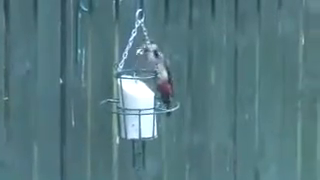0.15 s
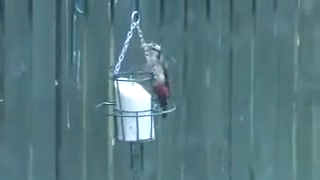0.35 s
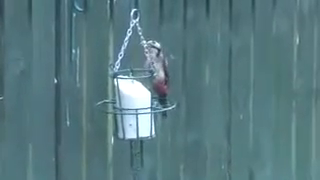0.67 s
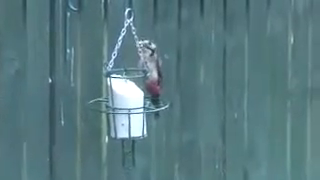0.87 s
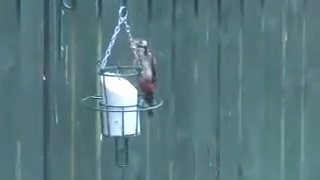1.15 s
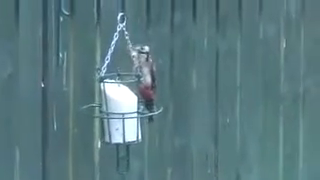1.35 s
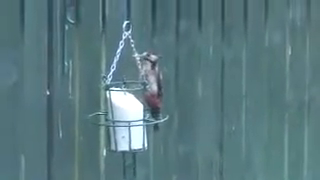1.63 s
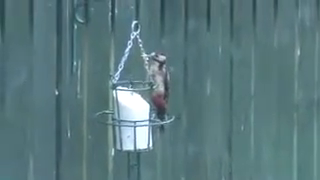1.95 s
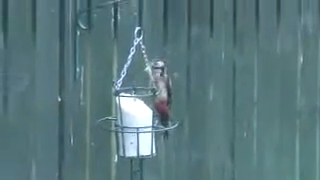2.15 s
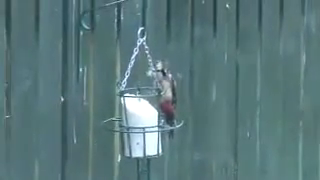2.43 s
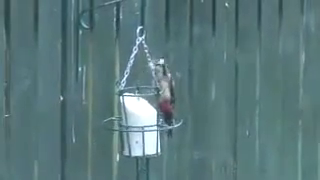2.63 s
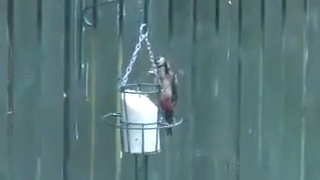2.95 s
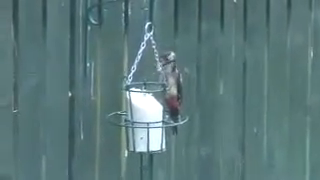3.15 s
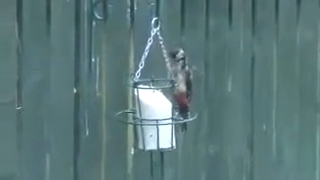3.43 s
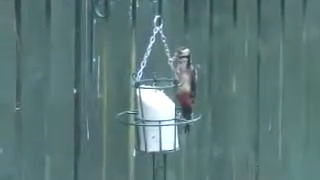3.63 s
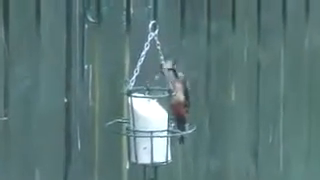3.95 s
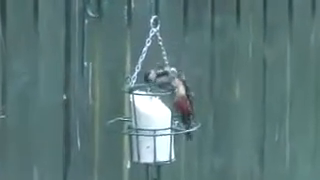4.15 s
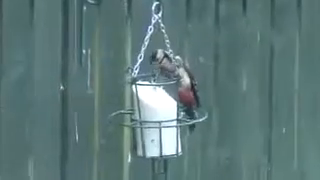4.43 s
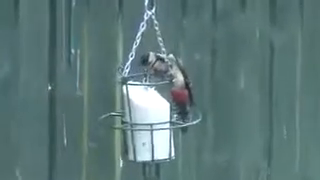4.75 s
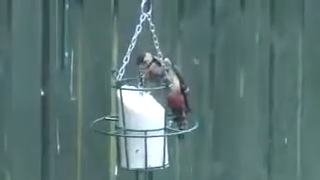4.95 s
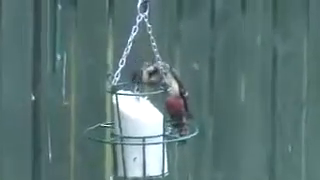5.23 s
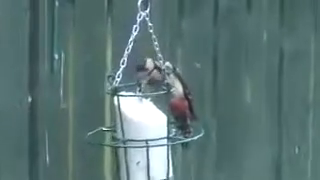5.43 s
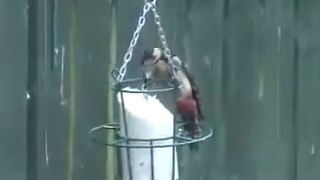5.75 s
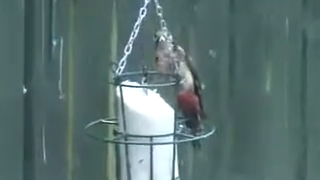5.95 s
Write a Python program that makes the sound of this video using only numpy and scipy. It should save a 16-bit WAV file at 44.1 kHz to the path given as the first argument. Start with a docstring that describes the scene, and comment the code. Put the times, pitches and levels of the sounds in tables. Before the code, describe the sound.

Irregular crisp bill knocks, grainy scuffs and tiny wire ticks from a bird at a garden feeder, over constant mains hum and faint hiss.

```python
"""A young woodpecker pecks at a peanut cake in a hanging wire feeder.
From the start a mains hum, a faint electronic whine, soft air noise and a low rumble lie underneath.
First comes a scuff as the bird shifts its grip, made of shaped noise, with a dull thud of low noise after it.
Then come sharp pecks (short rings, crushing noise, a crack), each with its own thud, and soon thin wire ticks.
More scuffs fall in between. Hard surfaces nearby answer the scuffs, pecks and ticks."""
import sys
import numpy as np
from scipy import signal
from scipy.fft import rfft, irfft, next_fast_len
from scipy.io import wavfile
from scipy.ndimage import uniform_filter1d, map_coordinates

SR = 44100
rng = np.random.default_rng(int(sys.argv[2]) if len(sys.argv) > 2 else 0)


def materialize(psi):
    """Save the field psi as 16-bit PCM at rate SR to the path in sys.argv[1].

    A 1-D psi becomes a single channel; in a 2-D psi each row is a channel.
    """
    bounded = np.clip(np.atleast_2d(psi).T, -1, 1)
    quanta = np.round(bounded * 32767).astype(np.int16)
    wavfile.write(sys.argv[1], SR, quanta)


N = 268128  # length of the scene in samples


def amp(db):
    """Turn decibels into a plain factor."""
    return 10 ** (np.asarray(db) / 20)


def unit(x):
    """Scale x to an rms of 1."""
    return x / np.sqrt(np.mean(x ** 2) + 1e-20)


def burst(x):
    """Scale x to a total energy of 1."""
    return x / np.sqrt(np.sum(x ** 2) + 1e-20)


def along(points, hz):
    """Read a curve of (Hz, value) points at any pitch, on a log pitch axis."""
    point_hz, values = np.transpose(points)
    return np.interp(np.log(hz + 1), np.log(point_hz + 1), values)


def filtered(x, response):
    """Multiply the spectrum of x by a response, given as a function of frequency."""
    n = x.shape[-1]
    padded = next_fast_len(n + 8192)
    spectrum = rfft(x, padded) * response(np.fft.rfftfreq(padded, 1 / SR))
    return irfft(spectrum, padded)[..., :n]


def noise(spectrum, size):
    """Make noise of rms 1, coloured by (Hz, dB) points."""
    return unit(filtered(rng.standard_normal(size), lambda hz: amp(along(spectrum, hz))))


def add(track, s, sound):
    """Mix a sound into the track at time s in seconds."""
    start = max(round(s * SR), 0)
    track[:, start:start + sound.shape[-1]] += sound[..., :N - start]


# Level of the mains hum over time. Each row: time in seconds, level in dB.
HUM_LEVELS = [(0.2, -44), (0.88, -43), (2.55, -45), (4.18, -43.5), (4.8, -43), (4.95, -44), (5.9, -45.5)]
# Tones of the electronic whine. Each row: pitch in Hz, average level in dB before it wavers.
WHINE_TONES = [(1319, -73), (1561, -73), (2697, -67), (3214, -78), (5701, -75), (8655, -73), (11541, -73),
               (14423, -77)]
# Colour of the soft air noise of the garden. Each row: pitch in Hz, relative level in dB per Hz.
AIR_COLOUR = [(88, -22), (150, -11), (186, -2.5), (274, -9), (332, -4.5), (445, -7), (481, -2), (572, -1),
              (695, -6), (1340, -6.5), (2410, -10.5), (3040, -12), (5870, -15), (15500, -25.5)]
# How alike the air noise is at left and right. Each row: pitch in Hz, likeness from 0 to 1.
AIR_LIKENESS = [(60, 0.11), (150, 0.11), (380, 0.61), (950, 0.39), (2380, 0.18), (5980, 0.16),
                (15000, 0.83)]
# Colour of the low rumble in the air. Each row: pitch in Hz, relative level in dB.
RUMBLE_COLOUR = [(20, -26), (35, -12), (52, 9), (72, -7), (150, -10.5), (200, -10.5), (330, -9),
                 (500, -21.5)]
HUM_HZ = 120
RUMBLE_DB = -60


def background(hum_db=0.0, air_db=-51.0, waver_db=1, rumble_side_db=-7):
    """A pure mains hum and faint wavering high tones, over soft, steady air noise and rumble."""
    t = np.arange(N) / SR
    hum_level = np.interp(t, *np.transpose(HUM_LEVELS)) + hum_db
    hum = amp(hum_level) * unit(np.sin(2 * np.pi * HUM_HZ * t))

    def waver():
        """A slow random drift with 5 new values a second."""
        return map_coordinates(rng.standard_normal(40), [t * 5])

    whine = 0
    for hz, db in WHINE_TONES:
        loudness = amp(waver_db * waver()) * amp(db)
        whine = whine + loudness * unit(np.sin(2 * np.pi * hz * t + .5 * waver()))

    def turn(hz):
        """The angle that splits the air noise into middle and side for the wanted likeness."""
        return np.arccos(np.clip(along(AIR_LIKENESS, hz), 0, 1)) / 2

    mid = filtered(noise(AIR_COLOUR, N), lambda hz: np.cos(turn(hz)))
    side = filtered(noise(AIR_COLOUR, N), lambda hz: np.sin(turn(hz)))
    air = amp(air_db) * np.array([mid + side, mid - side])
    # the rumble is much the same at both microphones
    rumble_side = amp(rumble_side_db) * noise(RUMBLE_COLOUR, N)
    rumble = noise(RUMBLE_COLOUR, N) + rumble_side * np.array([[1], [-1]])
    return air + hum + whine + amp(RUMBLE_DB) * rumble


# Echoes from nearby hard surfaces. Each row: typical delay in seconds,
# strength as a multiple of the direct sound (a minus sign flips the wave).
HARD_ECHOES = [(.0022, .3), (.0052, 1.4), (.0069, -.4)]
# How long the diffuse tail rings. Each row: pitch in Hz, time to fall by 60 dB in seconds.
TAIL_DECAY = [(100, 0.98), (800, 0.41), (2100, 0.28), (4000, 0.36), (8000, 0.29), (13000, 0.26)]


def surroundings(x, tail_db=7.0, scatter_db=0, scatter_s=0.0012, lean_db=6, width=0.62):
    """The direct sound from the left, a few hard echoes, dense scatter and a diffuse tail."""
    t = np.arange(SR // 3) / SR
    # each pitch of the tail dies away at its own pace
    hz, frame_s, z = signal.stft(rng.standard_normal((2, len(t))), SR, nperseg=256)
    fade = amp(-60 * frame_s / along(TAIL_DECAY, hz)[:, None])
    tail = signal.istft(z * fade, SR, nperseg=256)[1][:, :len(t)]
    tail = tail * (1 - np.exp(-t / 0.0029))
    scatter = rng.standard_normal((2, len(t))) * t ** 2 * np.exp(-t / scatter_s)
    # the two microphones sit close together and share part of the diffuse sound
    mid, side = amp(scatter_db) * burst(scatter) + amp(tail_db) * burst(tail)
    diffuse = np.array([mid + width * side, mid - width * side])
    paths = np.zeros(len(t))
    paths[0] = 1
    for delay, strength in HARD_ECHOES:
        # each echo delay varies a little at random from sound to sound
        paths[round(delay * rng.uniform(.92, 1.08) * SR)] += strength
    response = burst(paths) * amp([[lean_db / 2], [-lean_db / 2]]) + diffuse
    return signal.fftconvolve(x[None], burst(response), axes=1)


# Scuffs of claws and bill. Each row: start in seconds, level in dB, body pitch in Hz, rasp pitch in Hz,
# body in dB, grit in dB. The last two are changes from the usual mix of body, rasp and grit.
SCUFF_STROKES = [(0.0004, -33.5, 576, 1770, -4, -7.5), (1.1944, -32.5, 355, 2100, 0.5, -12),
                 (1.2223, -50.5, 355, 2670, 9, -20), (2.5327, -33, 834, 1320, -23, -7),
                 (3.3932, -28, 765, 3130, -7.5, -2.5), (3.4728, -36, 653, 2880, -4, 1.5),
                 (3.6037, -33, 764, 3770, -7, -1), (4.3674, -35, 544, 1300, -29, -21),
                 (4.6288, -33, 816, 2310, -5.5, -6), (4.8655, -19.5, 342, 2010, -9.5, -14.5),
                 (4.8983, -38.5, 257, 1940, 4, -14), (4.9421, -41.5, 690, 1180, 4.5, -2)]
# Hollow body of a scuff. Each row: multiple of the body pitch, relative level in dB.
BODY_COLOUR = [(.2, -22), (.5, -4), (1, -5.5), (1.6, -8.5), (3, -10), (8, -52)]
# Rasp of a scuff. Each row: multiple of the rasp pitch, relative level in dB.
RASP_COLOUR = [(.15, -18), (.45, -17), (1, 0.5), (1.5, -11), (2.5, -16), (6, -33.5)]
# Fine grit of a scuff. Each row: pitch in Hz, relative level in dB.
GRIT_COLOUR = [(2000, 0.5), (5000, -5), (8000, 4), (12500, 2), (16000, -7)]
SCUFF_S, SCUFF_ATTACK_S = 0.018, 0.00017  # fall and rise times of a stroke


def scuffs(body_db=26, rasp_db=25, grit_db=26, grain_db=5):
    """Claws and bill drag in short, grainy strokes: a hollow body, a rasp and fine grit."""
    track, t = np.zeros((2, N)), np.arange(SR // 8) / SR
    for s, db, body_hz, rasp_hz, body, grit in SCUFF_STROKES:
        # smoothed random loudness makes the stroke grainy
        roughness = unit(uniform_filter1d(rng.standard_normal(len(t)), size=60))
        grains = amp(grain_db * roughness)
        stroke = (1 - np.exp(-t / SCUFF_ATTACK_S)) * np.exp(-(t / SCUFF_S) ** 2) * grains
        layers = [(np.multiply(BODY_COLOUR, [body_hz, 1]), body + body_db),
                  (np.multiply(RASP_COLOUR, [rasp_hz, 1]), rasp_db),
                  (GRIT_COLOUR, grit + grit_db)]
        scuff = 0
        for colour, level in layers:
            scuff = scuff + amp(db + level) * burst(stroke * noise(colour, len(t)))
        add(track, s, surroundings(scuff))
    return track


# Colour of the dull thud. Each row: pitch in Hz, relative level in dB.
THUD_COLOUR = [(25, -37), (48, -5), (85, 2.5), (120, -12.5), (190, -14.5), (400, -29.5), (1000, -43)]
THUD_DELAY_S, THUD_SWELL_S = 0.00771, 0.024  # wait after the blow, then time to the peak of the swell
THUD_DB, TYPICAL_BLOW_DB = -13, -20  # level of the thud after a peck of typical level
THUD_GROWS = .4  # dB of thud per dB of blow: the thud grows more slowly than the blow


def thuds(scuff_db=-0.5):
    """Every scuff or peck jolts the feeder, and a dull, low boom swells after it."""
    track, t = np.zeros((2, N)), np.arange(SR // 4) / SR
    swell = t * np.exp(-t / THUD_SWELL_S)
    for blows, kind_db in [(SCUFF_STROKES, scuff_db), (PECK_BLOWS, 0)]:
        for s, db, *_ in blows:
            level = THUD_DB + kind_db + THUD_GROWS * (db - TYPICAL_BLOW_DB)
            add(track, s + THUD_DELAY_S, amp(level) * burst(noise(THUD_COLOUR, len(t)) * swell))
    return track


# Pecks; each has its own middle and high pitch and its own mix. Each row: start in seconds, level in dB,
# middle resonance in Hz, high resonance in Hz, low resonance in dB, high resonance in dB, crack in dB.
# The last three are changes from the usual mix with the middle resonance.
PECK_BLOWS = [(0.8207, -20.5, 2000, 2380, -14, -18.5, -8), (1.0078, -27, 1920, 2710, -7, 1, 2),
              (1.3308, -25.5, 1830, 2630, -14, -7.5, -4), (1.4173, -17, 1940, 3040, -15.5, -10.5, -10),
              (1.6017, -24, 1970, 2840, 1, -30, -5.5), (1.721, -17.5, 1850, 3340, -38, -5.5, -3.5),
              (1.8946, -21, 2260, 2680, -3.5, -10.5, -5.5), (2.4214, -23, 1920, 2610, -15, -31, -9),
              (2.5621, -20, 2130, 2870, -8.5, -5, -8.5), (2.5695, -29, 2260, 2680, -12, -12, 2.5),
              (2.7163, -25.5, 2150, 3250, -14, -3.5, -4), (2.8313, -36, 2070, 2650, -6, 9, 3.5),
              (2.9602, -23, 1700, 2850, -15, -0.5, -29), (3.7747, -25, 1730, 2390, -3, -10, -7),
              (3.8714, -25, 2400, 2480, -3, -14, -3), (4.014, -36.5, 1730, 2800, 0, -26, -10),
              (4.3951, -33, 1630, 2470, -11, -3, -11), (4.563, -25, 2240, 2500, -8, -20, -3.5),
              (4.6278, -35.5, 2130, 2420, 5, -8, -26), (4.8604, -21, 1960, 3480, -15, -12, -4),
              (4.8794, -31, 1980, 2520, -17, -15, -15), (4.9309, -28.5, 1780, 2490, -4, -2, -9),
              (4.9834, -26.5, 1920, 3350, -4, -8, -18), (5.0838, -39.5, 1960, 2610, 1, 0, -18),
              (5.4356, -48.5, 1900, 3000, -6, 9, 16.5)]
# Colour of the crushing noise. Each row: pitch in Hz, relative level in dB.
KNOCK_COLOUR = [(500, -48), (1000, 7), (1500, 7), (2400, 11), (3000, 9.5), (4000, 5.5), (5000, -14),
                (9000, -14)]
# Colour of the bright crack. Each row: pitch in Hz, relative level in dB.
CRACK_COLOUR = [(200, -15), (500, -1.5), (1500, 0), (3300, 3.5), (5000, 4.5), (7200, -4.5), (8400, 0.5),
                (10000, -7.5), (12300, -4.5), (14000, -17), (16000, -19)]
LOW_HZ = 1260  # pitch of the low resonance, one typical value used for all pecks
LOW_T60_S, MIDDLE_T60_S, HIGH_T60_S = 0.008, 0.0076, 0.005  # times for the rings to fall by 60 dB
RING_ATTACK_S = 0.00021


def pecks(ring_db=21.0, low_db=-1.5, high_db=0.0, knock_db=22.5, knock_s=0.0016,
          crack_at=.0025, crack_s=0.00076, crack_db=17, left_db=2.0):
    """Each blow rings three heavily damped resonances, crushes the cake and gives a bright crack."""
    track, t = np.zeros((2, N)), np.arange(SR // 24) / SR
    for s, db, middle_hz, high_hz, low, high, snap in PECK_BLOWS:
        resonances = [(LOW_HZ, low + low_db, LOW_T60_S),
                      (middle_hz, 0, MIDDLE_T60_S),
                      (high_hz, high + high_db, HIGH_T60_S)]
        ring = 0
        for hz, level, t60 in resonances:
            shape = (1 - np.exp(-t / RING_ATTACK_S)) * amp(-60 * t / t60)
            ring = ring + amp(level + ring_db) * burst(shape * np.sin(2 * np.pi * hz * t))
        # crushing fills the gaps between the resonances with rough noise
        crush = noise(KNOCK_COLOUR, len(t)) * t * np.exp(-t / knock_s)
        knock = amp(high / 2 + knock_db) * burst(crush)
        # the crack peaks a moment after the blow
        crack_shape = np.exp(-abs(t - crack_at) / crack_s)
        crack = amp(snap + crack_db) * burst(noise(CRACK_COLOUR, len(t)) * crack_shape)
        add(track, s, surroundings(amp(db) * (ring + knock + crack)))
    return track * amp([[left_db / 2], [-left_db / 2]])


# Wire ticks. Each row: time in seconds (the sound starts a little earlier, by lead_s), level in dB,
# ring pitch in Hz, click in dB as a change from the usual mix of click and ring.
WIRE_TICKS = [(1.1348, -41, 12700, 5), (1.3246, -33.5, 11700, -10), (1.499, -35, 12700, -9),
              (1.723, -32, 12300, -6), (1.8292, -37, 11600, -10), (1.8982, -28, 8470, -10),
              (2.4269, -34, 8400, -7), (2.6704, -29.5, 12200, -7), (2.835, -30, 12500, -14),
              (3.6167, -26.5, 9800, -10), (3.715, -37, 8080, -13), (3.775, -41.5, 8140, 1),
              (3.8646, -34, 12800, -9), (4.0151, -33, 8200, -3), (4.6339, -31.5, 8330, -3),
              (4.7357, -39.5, 10100, -3.5), (4.9317, -27.5, 11600, -5), (5.0818, -33.5, 11700, -15),
              (5.436, -30.5, 11000, -10)]
# Colour of the click of a wire. Each row: pitch in Hz, relative level in dB.
CLICK_COLOUR = [(2000, -0.5), (5000, -7), (8000, -7), (10000, -12.5), (12300, 3.5), (14000, -26),
                (16000, -47)]
TICK_T60_S, TICK_REF_HZ = 0.015, 8100  # time to fall by 60 dB at a reference pitch
TICK_DAMPING = 7.5  # power by which higher rings die sooner


def ticks(ring_db=16, click_db=23, click_t60=0.0091, lead_s=.002):
    """Wire touches wire: a tiny click and a thin ring that is shorter the higher it is."""
    track, t = np.zeros((2, N)), np.arange(SR // 12) / SR
    for s, db, hz, click_level in WIRE_TICKS:
        t60 = TICK_T60_S * (TICK_REF_HZ / hz) ** TICK_DAMPING
        ring = amp(ring_db) * burst(amp(-60 * t / t60) * np.sin(2 * np.pi * hz * t))
        click_noise = noise(CLICK_COLOUR, len(t)) * amp(-60 * t / click_t60)
        click = amp(click_db + click_level) * burst(click_noise)
        add(track, s - lead_s, surroundings(amp(db) * (ring + click)))
    return track


def scene():
    """The bird at the feeder over the steady background."""
    return background() + scuffs() + thuds() + pecks() + ticks()


LOW_CUT_HZ, TOP_HZ = 40, 15900


def record(dry):
    """Cut the deepest bass and keep nothing from the upper band limit upwards."""
    return filtered(dry, lambda hz: (1 - np.exp(-(hz / LOW_CUT_HZ) ** 4)) * (hz < TOP_HZ))


dry = scene()
out = record(dry)
materialize(out)
```